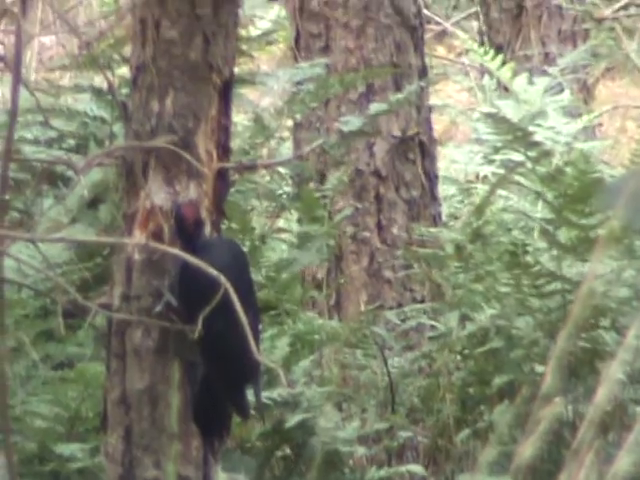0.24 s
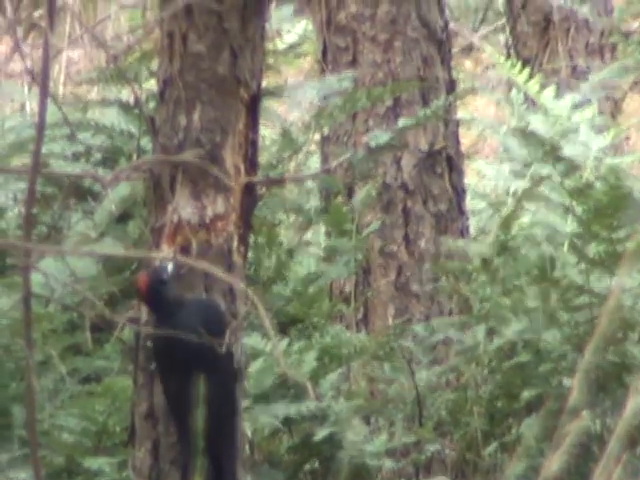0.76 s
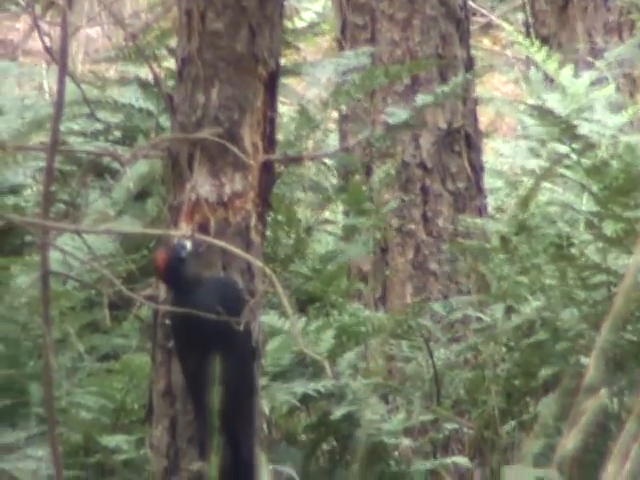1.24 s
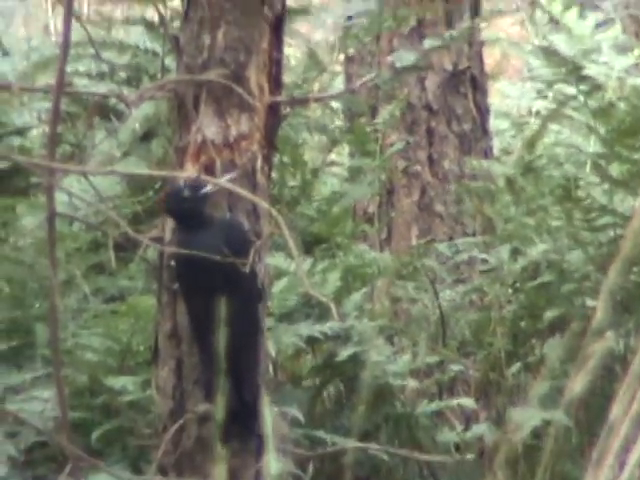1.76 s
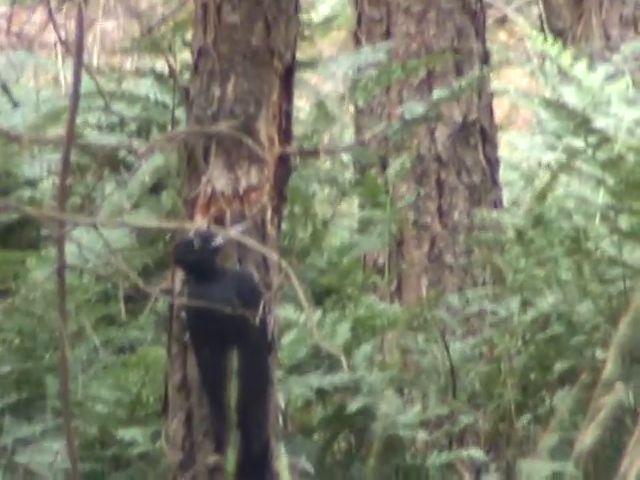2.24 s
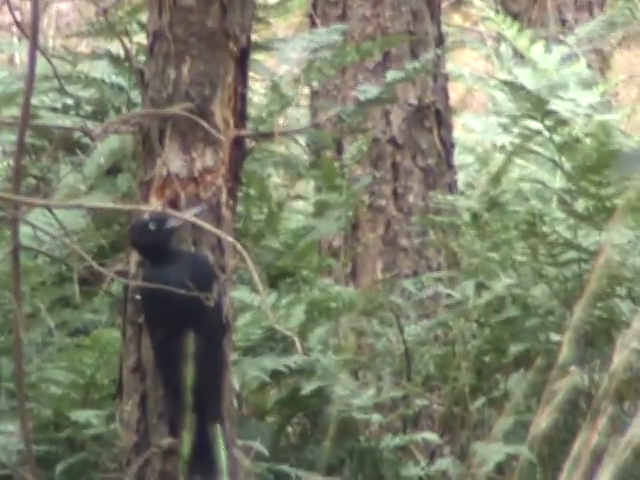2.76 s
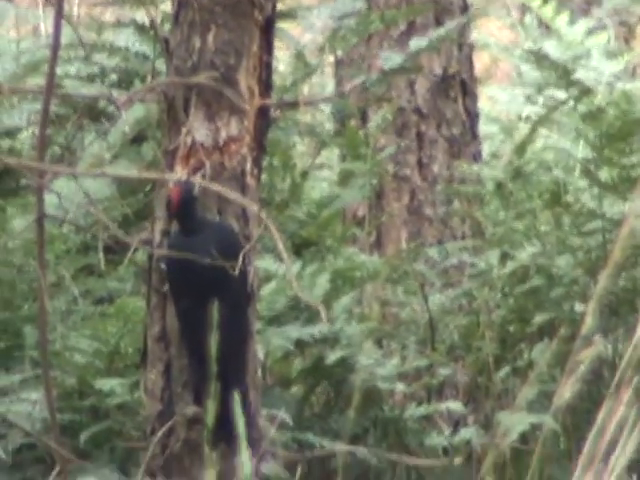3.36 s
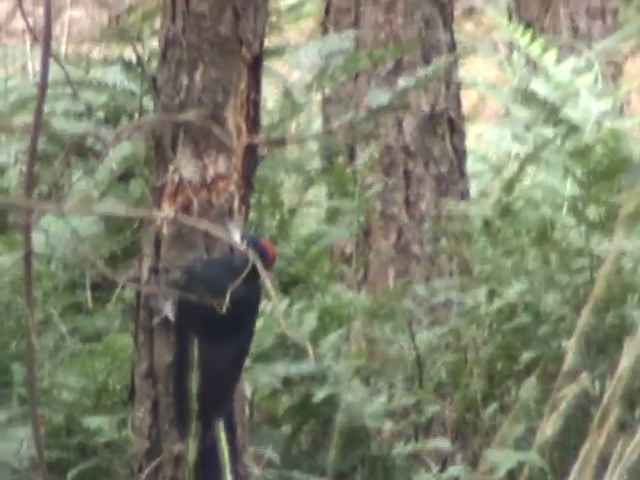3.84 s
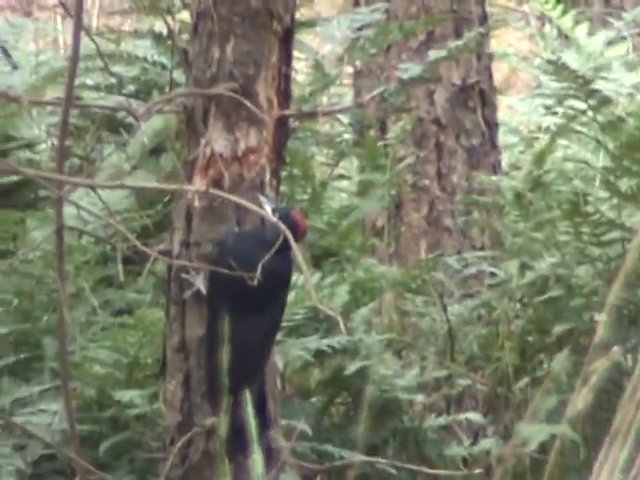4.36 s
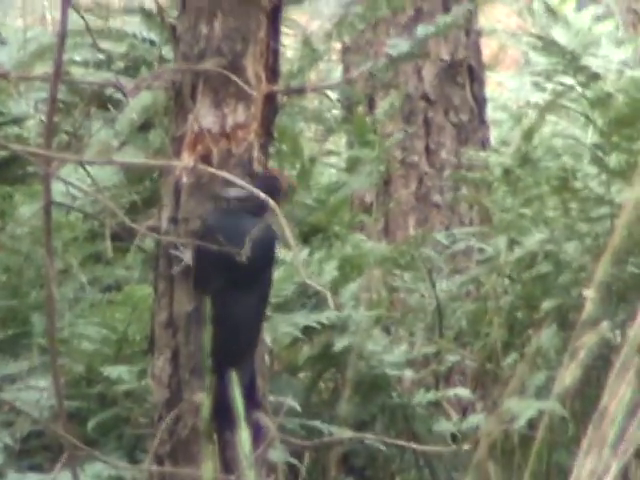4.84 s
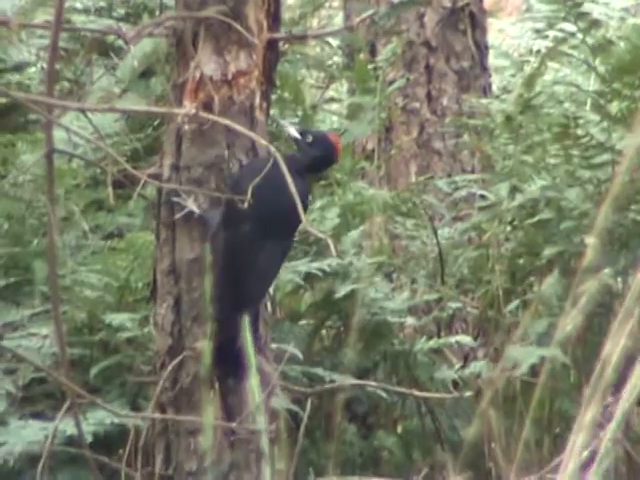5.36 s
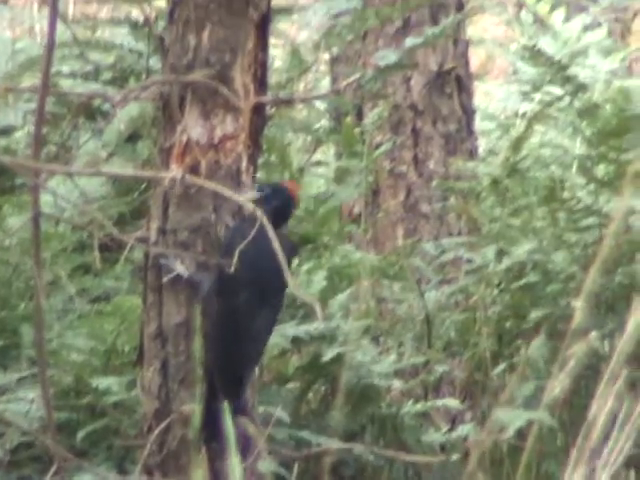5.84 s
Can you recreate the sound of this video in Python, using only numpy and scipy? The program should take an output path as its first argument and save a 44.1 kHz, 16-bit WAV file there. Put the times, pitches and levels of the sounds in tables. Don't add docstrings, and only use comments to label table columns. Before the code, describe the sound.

A woodpecker works on a thin trunk: small scratchy ticks first, under fern rustle, then isolated sharp cracks with short hollow wooden knocks behind them. The blows are uneven, with faint crumbs between, and the loudest cluster snaps just after five seconds, followed by small bumps and scraping bark. The pecks sit slightly left, with almost no echo. Low outdoor hush and a tiny regular motor whirr from the recording device continue throughout.

```python
import sys
import numpy as np
from scipy import signal
from scipy.io import wavfile

SR = 44100
rng = np.random.default_rng(int(sys.argv[2]) if len(sys.argv) > 2 else 0)


def voltage_ratio(level):
    return 10 ** (np.asarray(level, float) / 20)


def store_pcm(level_fs):
    pcm = np.round(np.clip(level_fs, -1, 1) * 32767).astype(np.int16)
    wavfile.write(sys.argv[1], SR, np.atleast_2d(pcm).T)


N = 268789


def rms_one(x):
    return x / np.sqrt(np.mean(x ** 2) + 1e-20)


def in_time(rows):
    s, db = np.transpose(rows)
    return voltage_ratio(np.interp(np.arange(N) / SR, s, db, left=-120, right=-120))


def at_hz(points, hz):
    f, level = np.array(points)[:, :2].T
    return np.interp(np.log(hz), np.log(f), level)


def drift(rate):
    hop = 40
    r = np.exp(-2 * np.pi * rate * hop / SR)
    white = rng.standard_normal(N // hop + 2002)
    slow = signal.lfilter([1], [1, -2 * r, r * r], white)[2000:]
    return np.interp(np.arange(N) / hop, np.arange(len(slow)), rms_one(slow))


def ring(force, hz, t60):
    r = voltage_ratio(-60 / (t60 * SR))
    w = 2 * np.pi * hz / SR
    return signal.lfilter([0, np.sin(w)], [1, -2 * r * np.cos(w), r * r], force + 1e-18)


def pan(x, db):
    return np.array([x * voltage_ratio(db / 2), x * voltage_ratio(-db / 2)])


def grit(lumps_db):
    sizes = voltage_ratio(lumps_db * np.minimum(rng.exponential(1, (2, N)), 6))
    return rms_one(sizes * rng.standard_normal((2, N)))


def swells(times, levels_db, rise_s, fall_db_per_s):
    t = np.arange(N) / SR - np.reshape(times, (-1, 1))
    shape = np.clip(1 + t / rise_s, 0, 1) ** 2 * voltage_ratio(-fall_db_per_s * np.maximum(t, 0))
    peaks = voltage_ratio(np.reshape(levels_db, (-1, 1)))
    return np.sqrt(np.sum((peaks * shape) ** 2, axis=0))


def banded(white, spectrum, patchy_db):
    # f/Hz, coherence/1
    likeness = [(40, .99), (130, 0.98), (350, 0.72), (1400, 0.025), (2700, 0.067), (4000, 0.52),
                (7000, 0.85), (11000, 0.79), (13000, 0.92), (15000, 0.93)]
    edges = 20 * 2 ** np.arange(0, 9.8, 1 / 3)
    out = 0
    for k, (low, high) in enumerate(zip(edges, edges[1:])):
        band = signal.butter(2, [low, high], "band", fs=SR, output="sos")
        mid, side = signal.sosfilt(band, np.roll(white, 997 * k, axis=1))
        hz = np.sqrt(low * high)
        alike = np.clip(at_hz(likeness, hz), 0, 1)
        gain = voltage_ratio(at_hz(spectrum, hz) + patchy_db * drift(9.5))
        out = out + gain * (np.sqrt(1 + alike) * mid + np.sqrt(1 - alike) * side * [[1], [-1]])
    return out


def hush():
    # f/Hz, density level/dB
    woods = [(21, -37), (35, 1.5), (70, -1.5), (113, -1), (271, 1.5), (526, 0.5), (582, 1.5), (1050, -2.5),
             (1540, -6), (1940, -8), (2700, -10.5), (7130, -11), (8980, -13.5), (13900, -16.5),
             (15800, -10.5)]
    air = rms_one(banded(rng.standard_normal((2, N)), woods, patchy_db=1.68))
    level_db = -57 + 1.5 - 0.205 * np.arange(N) / SR
    return voltage_ratio(level_db) * air * voltage_ratio(np.array([[.3], [-.3]]))


def drive(level_db=-1.5):
    # delay t/s, f/Hz, level/dB, t60/s
    drive_contacts = [(.0316, 2170, -59, .024), (.032, 1930, -60, .024), (.0362, 2110, -62, .022),
                      (.0365, 1900, -62, .022), (.0308, 3900, -66, .01), (.009, 4000, -68, .01),
                      (.012, 6200, -66, .01)]
    turns_per_s, start_db, settles_s = 25, -4, 2.3
    beat_depth_db, beat_turns = 3.0, 66
    turns = np.arange(0, N / SR, 1 / turns_per_s)
    beat_db = beat_depth_db * np.cos(np.pi * np.arange(len(turns)) * (1 + 1 / beat_turns))
    out = 0
    for delay, hz, db, t60 in drive_contacts:
        clicks = np.zeros(N + SR)
        uneven_db = 2.5 * rng.standard_normal(len(turns))
        at = ((turns + delay) * SR).astype(int)
        clicks[at] = voltage_ratio(db + beat_db * np.sign(hz - 2000) + uneven_db)
        out = out + ring(clicks[:N], hz, t60)
    settling_db = np.interp(np.arange(N) / SR, [0, settles_s], [start_db, 0])
    smooth = signal.lfilter([.5, .5], [1], out)
    return pan(smooth * voltage_ratio(level_db + drift(1.5) + settling_db), -0.5)


def far_engine():
    # t/s, low order level/dB, high order level/dB
    engine_swells = [
        (0.9, -64, -71),
        (1.41, -59.5, -68),
        (1.78, -70, -61),
        (2.15, -69.5, -60),
        (2.54, -68, -67),
    ]
    rise_s, fall_db_per_s = .15, 82
    s, low_db, high_db = np.transpose(engine_swells)
    low = rms_one(ring(rng.standard_normal(N), 176, 0.44))
    low = low * swells(s, low_db - 1.5, rise_s, fall_db_per_s)
    high = rms_one(ring(rng.standard_normal(N), 342, 0.036))
    high = high * swells(s, high_db - 3, 2 * rise_s, fall_db_per_s)
    return pan(low + high, 0.3)


def far_bird():
    # start t/s, length t/s, f/Hz, level/dB
    peeps = [
        (0.04, .09, 6900, -63),
        (0.3, .05, 7020, -66),
        (0.633, 0.062, 6820, -59),
        (1.345, 0.091, 6720, -62),
        (1.441, .07, 6720, -66),
        (1.51, .07, 6230, -67),
    ]
    sag_hz_per_s, arch_db, edge_s = 1540, 9, 0.0027
    t = np.arange(N) / SR
    out = 0
    for s, length, hz, db in peeps:
        along = np.clip((t - s) / length, 0, 1)
        pitch = (hz - sag_hz_per_s * length * along) * (1 + 0.0085 * drift(60))
        fade = np.clip(np.minimum(t - s, s + length - t) / edge_s, 0, 1)
        level_db = db - arch_db * (2 * along - 1) ** 2 + 3.4 * drift(65)
        out = out + np.sqrt(2) * fade * voltage_ratio(level_db) * np.sin(2 * np.pi * np.cumsum(pitch) / SR)
    return pan(out, 4.1)


def ferns(width_hz=230):
    # f/Hz, width f/Hz, level/dB
    fronds = [(2250, 1300, -3), (2720, 280, -0.5), (4450, 660, -1.5), (6450, 560, -5.5)]
    # t/s, level/dB, f/Hz of the stiffest fronds
    brushes = [(0.01, -57.5, 3170), (0.16, -61.5, 3300), (0.29, -59, 4200), (0.325, -53, 3600),
               (0.4, -60, 3500), (0.5, -54, 3380), (0.66, -56.5, 3260), (0.81, -57.5, 3400),
               (0.93, -57, 3330), (1.1, -58, 3300), (1.39, -69, 3690)]
    rise_s, fall_db_per_s, rest_db = .03, 55, -7
    sag_hz_per_s = 980
    near, apart = grit(1.8)
    sides = np.array([near + 0.46 * apart, near - 0.23 * apart])
    rest = 0
    for hz, width, db in fronds:
        rest = rest + voltage_ratio(db + .8 * drift(9)) * rms_one(ring(sides, hz, 2.2 / width))
    s, db, hz = np.transpose(brushes)
    t = np.arange(N) / SR + rise_s
    last = np.maximum(np.searchsorted(s, t) - 1, 0)
    centre_hz = np.maximum(hz[last] - sag_hz_per_s * (t - s[last]), 1000)
    turn = np.exp(2j * np.pi * np.cumsum(centre_hz) / SR)
    slow = signal.sosfilt(signal.butter(2, width_hz, fs=SR, output="sos"), sides / turn)
    stiff = rms_one(np.real(slow * turn))
    out = swells(s, db, rise_s, fall_db_per_s) * (stiff + voltage_ratio(rest_db) * rest)
    return out * voltage_ratio(np.array([[-1.2], [1.2]]))


def flakes():
    # t/s, level/dB
    scrape = [
        (0.0, -59.5),
        (1.5, -66),
        (3.5, -74.5),
        (5.17, -67),
        (5.8, -68),
        (6.09, -64.5),
    ]
    # t/s, level/dB
    slides = [
        (1.79, -59),
        (1.812, -59),
        (5.84, -46.5),
    ]
    # f/Hz, density level/dB
    flake_colour = [(590, -69), (1000, -57), (1130, -10), (1280, -14), (1670, -10), (2090, -1.5),
                    (3400, -6.5), (4460, -10.5), (5050, -4), (15000, -27)]
    s, db = np.transpose(slides)
    gain = in_time(scrape) * voltage_ratio(1.5) + swells(s, db, rise_s=0.0069, fall_db_per_s=183)
    return gain * rms_one(banded(grit(3.5), flake_colour, patchy_db=.6))


def creak():
    # t/s, level/dB
    creaks = [
        (1.394, -64),
        (1.502, -68),
        (1.615, -63),
        (1.712, -55.5),
        (1.79, -52.5),
        (1.815, -51.5),
    ]
    slips_per_s = 900
    slips = (rng.random(N) < slips_per_s / SR) * rng.standard_normal(N)
    s, db = np.transpose(creaks)
    load = swells(s, db, rise_s=.045, fall_db_per_s=400)
    return pan(load * rms_one(ring(ring(slips, 3770, 0.028), 3800, 0.015)), 1.7)


def echoes(x, t60=0.033, level_db=-24):
    t = np.arange(SR // 4) / SR
    tail = rng.standard_normal((2, len(t))) * voltage_ratio(-60 * t / t60) * (t > .004)
    tail = signal.sosfilt(signal.butter(1, 6000, fs=SR, output="sos"), tail)
    tail = tail / np.sqrt(np.sum(tail ** 2, axis=1, keepdims=True))
    return voltage_ratio(level_db) * signal.fftconvolve(x, tail, axes=1)[:, :N]


def struck(force, modes, dice, edges, centre_hz=None, focus_db=45, spread_db=2.0, detune=.01):
    out = 0
    for (hz, db, t60), luck, shift in zip(modes, dice, dice[::-1]):
        off_octaves = np.log2(hz / (centre_hz or hz))
        mode = ring(force, hz * (1 + detune * shift), t60)
        gain = voltage_ratio(db + spread_db * luck - focus_db * off_octaves ** 2)
        out = out + gain * mode / np.abs(mode).max()
    out = signal.sosfilt(signal.butter(2, edges, "band", fs=SR, output="sos"), out)
    return out / np.abs(out).max()


def contacts():
    # t/s, bright crack level/dB, trunk level/dB, bark level/dB, splinter level/dB
    dry_blows = [(1.8106, -35.5, -48, -34.5, -45), (2.6333, -43.5, -65, -44.5, -70),
                 (2.6414, -50, -47.5, -45.5, -70), (2.9095, -25, -36.5, -31, -37),
                 (3.1866, -41.5, -42, -46.5, -60), (3.5604, -40, -39.5, -39.5, -35.5),
                 (3.882, -37, -41.5, -37.5, -58), (5.0645, -42, -50, -29, -40),
                 (5.0795, -44, -54, -48, -47), (5.1058, -20, -21.5, -27, -50),
                 (5.2354, -48, -51.5, -46.5, -57), (5.4425, -47, -39.5, -42.5, -65),
                 (5.4522, -37.5, -35.5, -32, -41)]
    soft_blows = [(0.7644, -44.5, -42, -40, -32.5), (0.8236, -48, -43, -46, -55),
                  (1.151, -42.5, -56, -42, -65), (1.8184, -44, -45.5, -54, -48),
                  (2.0472, -41.5, -56, -49, -65), (2.4492, -63, -67, -44.5, -70),
                  (3.251, -43.5, -47, -43.5, -48.5), (3.3066, -47, -46, -50, -51),
                  (3.3146, -42, -57, -47.5, -65), (3.3552, -42, -57, -49, -65),
                  (3.6282, -28.5, -28.5, -29.5, -47), (3.915, -53, -46.5, -46.5, -65),
                  (3.9927, -46, -45.5, -44, -60), (4.0114, -49, -48, -47.5, -54),
                  (4.123, -39.5, -53, -50, -49), (4.1698, -41, -54, -60, -61),
                  (4.4529, -41.5, -47.5, -53, -63), (4.9492, -38.5, -63, -47, -65),
                  (5.0469, -48, -52, -52, -65), (5.0714, -47, -51, -48, -65),
                  (5.4866, -47, -42.5, -40, -60), (5.6979, -51, -49.5, -44, -70),
                  (5.8353, -36, -69, -41, -42)]
    crisp_blows = [
        (5.1028, -34, -28, -31, -25),
        (5.1125, -21.5, -33.5, -18.5, -27.5),
        (5.4787, -26.5, -37, -36, -31.5),
    ]
    sharp_blows = [
        (0.3633, -32, -54, -54, -70),
        (3.1343, -34.5, -39, -40.5, -40.5),
        (3.6701, -28, -28.5, -32, -37.5),
        (5.2678, -32, -53, -42, -47),
        (5.2648, -44, -60, -41.5, -37),
    ]
    slab_blows = [
        (5.8271, -31, -68, -38, -37),
        (5.8315, -25, -61, -27, -32.5),
    ]
    # t/s, crack level/dB, trunk level/dB
    ticks = [(0.0293, -43, -66), (0.1391, -43.5, -55), (0.1532, -41, -52), (0.17, -48, -59),
             (0.1898, -42, -54), (0.244, -51, -52), (0.3174, -49, -59), (0.731, -45, -65),
             (0.7392, -44, -66), (2.3633, -47, -62), (2.387, -43, -57), (2.4053, -50, -62),
             (2.5753, -51, -69), (2.9424, -49, -48.5), (2.9497, -49, -53), (2.968, -46.5, -48),
             (3.2907, -46, -65), (3.3326, -49, -57), (3.3757, -51, -59), (3.388, -45.5, -52),
             (3.6254, -43, -42), (4.1274, -42.5, -61), (4.149, -51, -53), (4.1655, -42.5, -66),
             (4.2093, -48, -58), (4.7133, -48, -52.5), (5.02, -47, -55), (5.034, -46, -65),
             (5.4294, -49, -53), (5.666, -46, -65)]
    # t/s, trunk level/dB
    bumps = [
        (5.1244, -40),
        (5.2714, -54),
        (5.286, -46.5),
        (5.3014, -49),
        (5.321, -50),
        (5.3344, -52),
        (5.3432, -47.5),
    ]
    crack_hz, tick_hz = 6600, 2140
    bark_db, splinter_db, bump_crack_db = -8.5, -11, -4.5
    touches = []
    for blows, blow_crack_hz, bark_hz in [(dry_blows, crack_hz, 2600), (soft_blows, crack_hz, 1820),
                                          (crisp_blows, 7000, 3400), (sharp_blows, 9700, 2480),
                                          (slab_blows, 6700, 2950)]:
        touches += [(*row, blow_crack_hz, bark_hz) for row in blows]
    for s, db, trunk_db in ticks:
        touches.append((s, db, trunk_db, db + bark_db, db + splinter_db, crack_hz, tick_hz))
    for s, db in bumps:
        touches.append((s, db + bump_crack_db, db, db + bark_db, db + 2 * splinter_db, crack_hz, tick_hz))
    return touches


def pecks(crush_s=0.00047, knock_s=0.00013, crumbs_db=-30, crumbs_s=0.008, lag_s=0.00088):
    # f/Hz, level/dB, t60/s
    crack_modes = [(5250, -1, 0.0037), (5750, -3, 0.01), (6370, 1.5, 0.008), (7020, 1.5, 0.0055),
                   (7760, 5.5, 0.0022), (8980, -6, 0.0086), (10300, -23, 0.0015), (12500, -14, .003),
                   (15000, -23, .002)]
    trunk_modes = [(645, -6.5, 0.041), (728, -4, 0.03), (899, 1, 0.014)]
    bark_modes = [(1710, -10, 0.025), (1953, 2.2, 0.017), (2430, 6, 0.0065), (2865, 9.5, 0.0062),
                  (3300, 6, 0.0075)]
    splinter_modes = [(3837, 20, 0.016), (4180, -22, 0.016)]
    # low f/Hz, high f/Hz
    part_edges = [
        (4400, 13700),
        (610, 1080),
        (1500, 4600),
        (3500, 4450),
    ]
    crack_spread_oct, spot_spread_oct = .12, .04
    left_db, round_s, round_db = 3, 5.75, 2
    size = 2000
    t = np.arange(size) / SR
    out = np.zeros(N + size)
    crush = t / crush_s * np.exp(-t / crush_s)
    crush = crush + voltage_ratio(crumbs_db) * np.exp(-t / crumbs_s)
    late = np.maximum(t - lag_s, 0)
    push = late / knock_s * np.exp(-late / knock_s)
    for s, crack_db, trunk_db, bark_db, splinter_db, crack_hz, bark_hz in contacts():
        dice = rng.standard_normal(size)
        rough = crush * dice
        crack_hz = crack_hz * 2 ** (crack_spread_oct * dice[-90])
        bark_hz = bark_hz * 2 ** (spot_spread_oct * dice[-91])
        crack = struck(rough, crack_modes, dice[-20:], part_edges[0], crack_hz)
        trunk = struck(push, trunk_modes, dice[-40:-20], part_edges[1])
        bark = struck(rough, bark_modes, dice[-60:-40], part_edges[2], bark_hz)
        splinter = struck(rough, splinter_modes, dice[-80:-60], part_edges[3])
        at = round((s - .0005) * SR)
        out[at:at + size] += voltage_ratio(crack_db + 3) * crack + voltage_ratio(trunk_db + 3) * trunk
        out[at:at + size] += voltage_ratio(bark_db + 3) * bark + voltage_ratio(splinter_db) * splinter
    return pan(out[:N], np.where(np.arange(N) / SR < round_s, left_db, round_db))


def scene():
    close = pecks() + creak()
    soft = ferns() + flakes() + hush() + far_bird() + far_engine() + drive()
    soft = signal.sosfilt(signal.cheby2(16, 50, 16050, fs=SR, output="sos"), soft)
    return close + echoes(close) + soft


def low_pass(x):
    return signal.sosfilt(signal.butter(12, 16960, fs=SR, output="sos"), x)


def record(dry):
    mix = signal.sosfilt(signal.cheby2(20, 60, 17050, fs=SR, output="sos"), dry)
    return low_pass(mix)


dry = scene()
out = record(dry)
store_pcm(out)
```